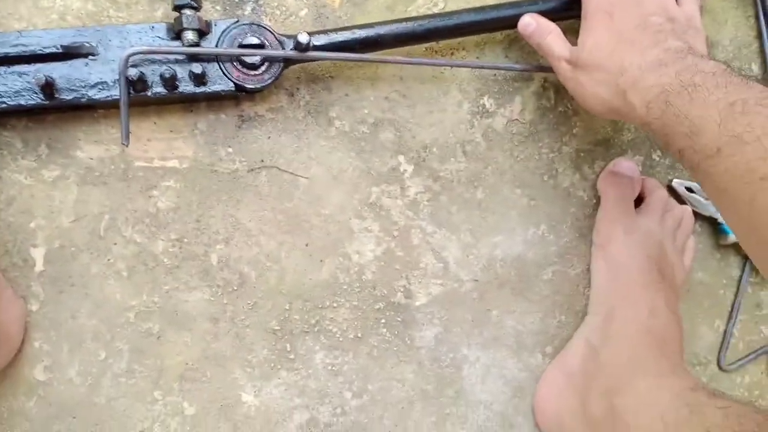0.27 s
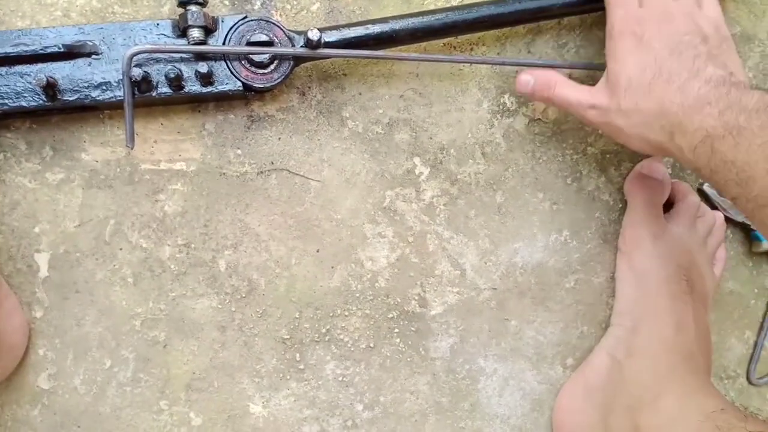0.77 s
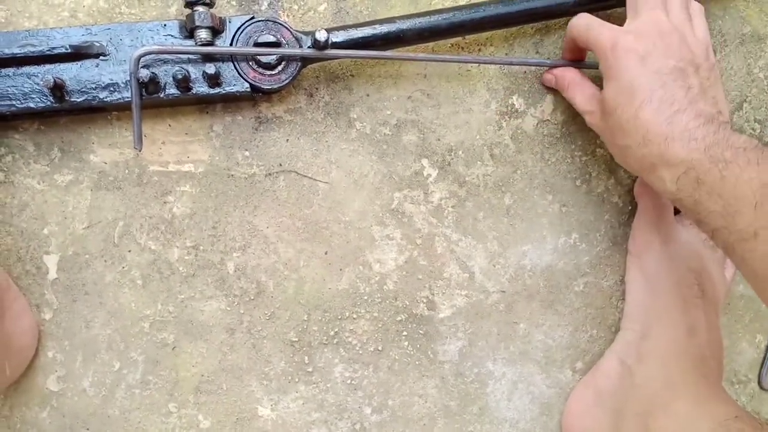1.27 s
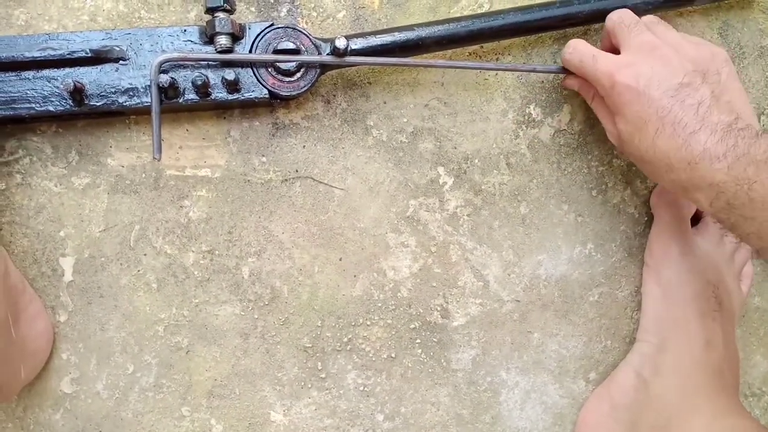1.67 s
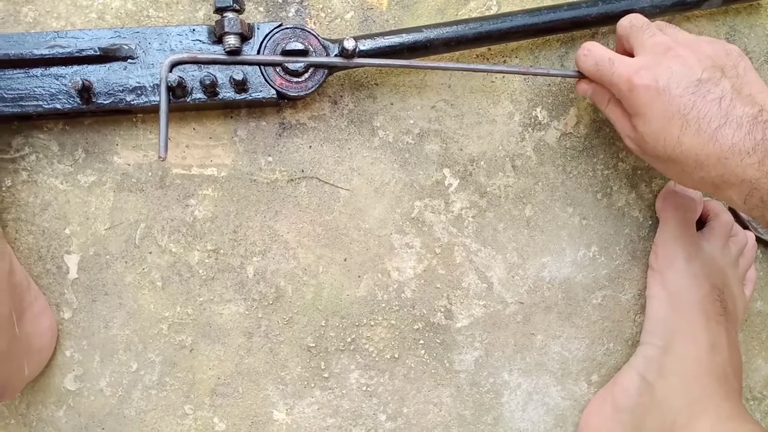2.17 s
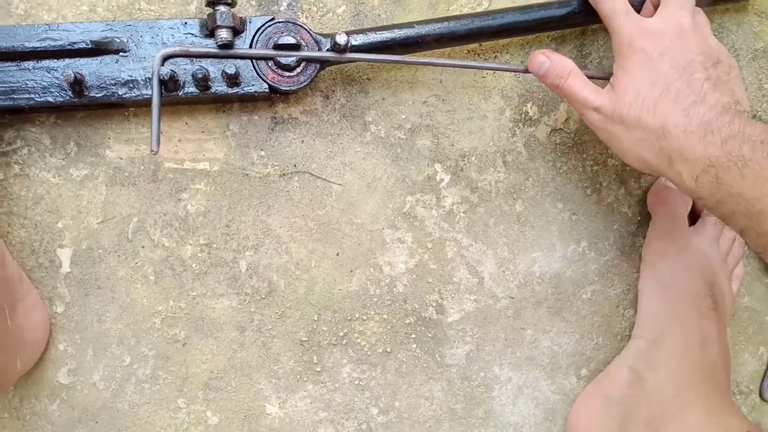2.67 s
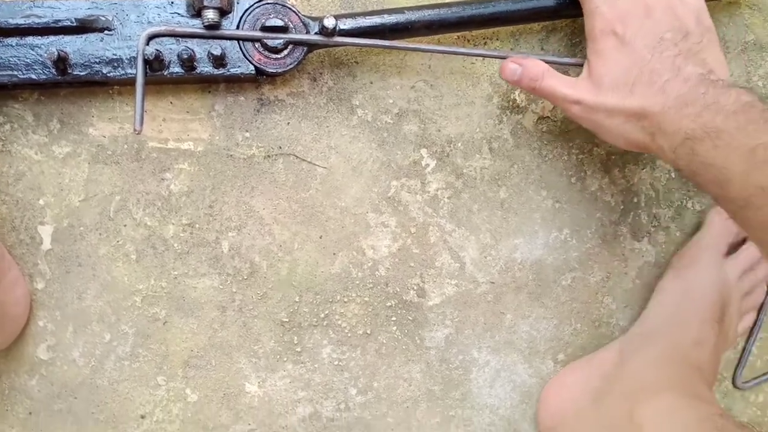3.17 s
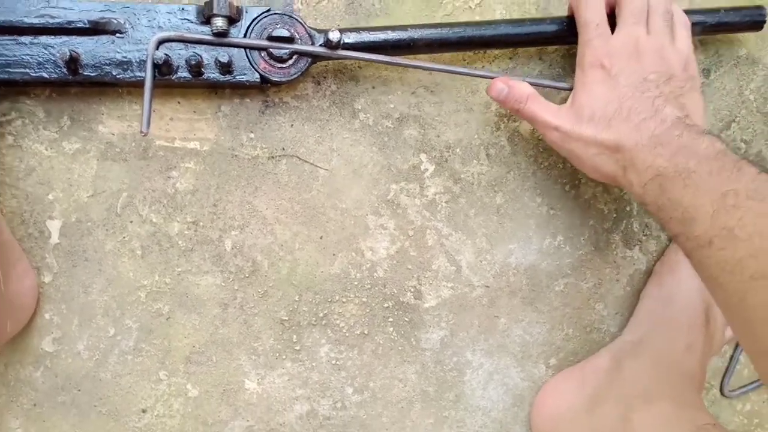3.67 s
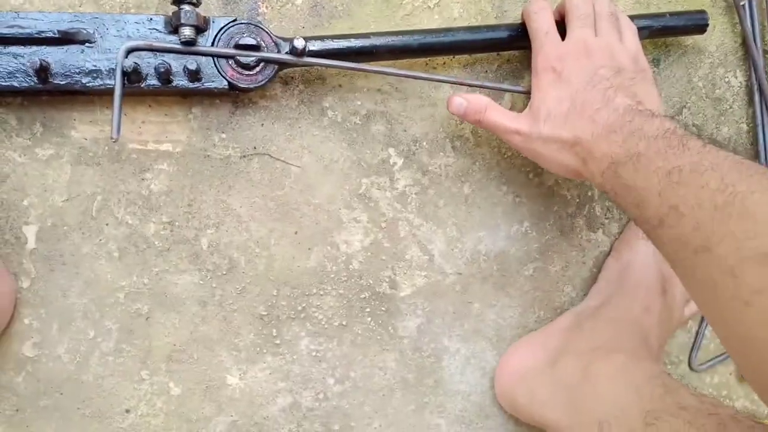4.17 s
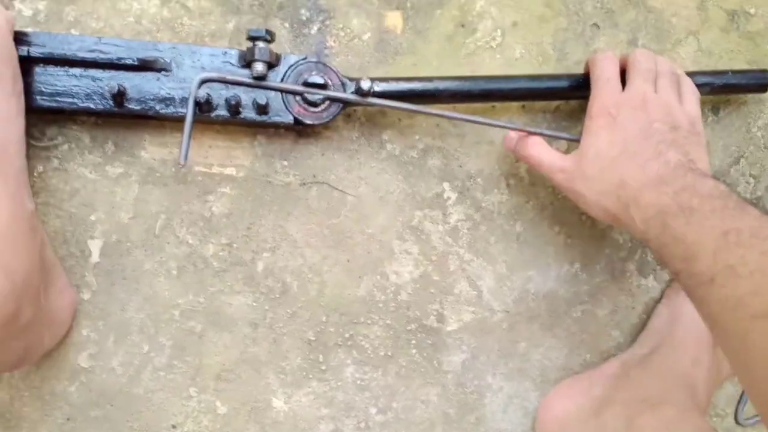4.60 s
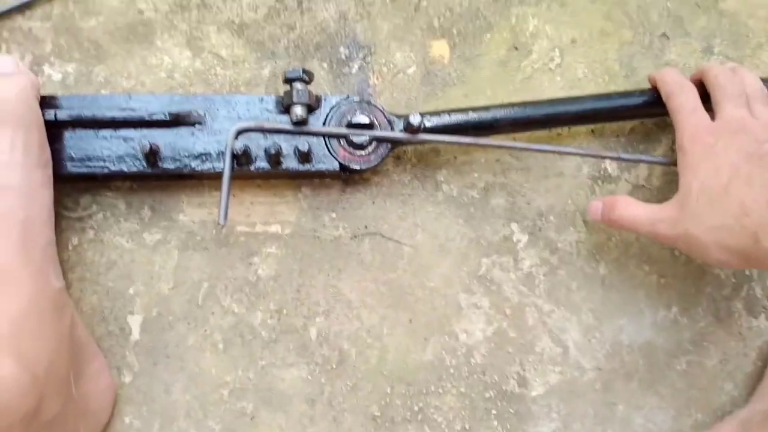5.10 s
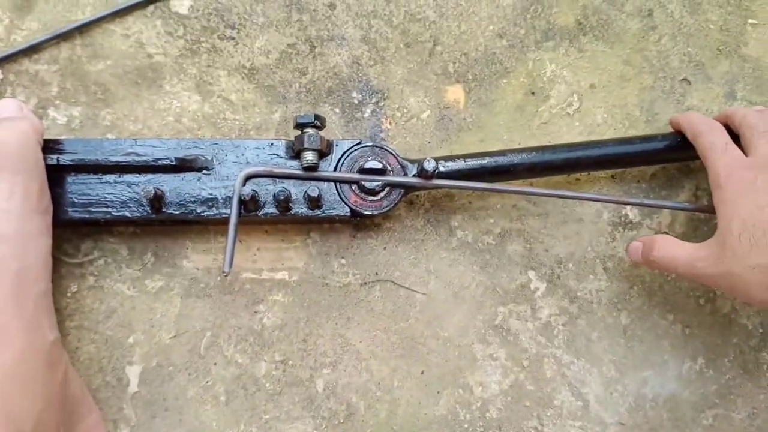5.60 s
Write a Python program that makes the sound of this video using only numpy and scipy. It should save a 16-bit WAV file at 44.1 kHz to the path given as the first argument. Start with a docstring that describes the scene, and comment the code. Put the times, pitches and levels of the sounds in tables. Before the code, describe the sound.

A hand brushes softly over a metal bending tool during the first second, close by. A thin steel bar knocks lightly against it at about 1.4 and 1.5 seconds. At 2 seconds a brief rasp leads into a sharp, ringing clink, the loudest sound. From 3.1 to 3.8 seconds the handling gets busier: skin slides, the bar snaps over a pin with bright ticks near 3.3, and the lever's pivot grinds in short pushes, with light clanks around 3.5 and 3.8. A bare foot drags faintly on concrete at about 4 seconds. At 4.4 seconds another rasp comes with one very short, shrill steel squeak. Hard walls add a short echo to the handling. Underneath, all very faint, are steady outdoor air, a distant motor hum and a high insect whine that swells and fades. A tiny, thin chirp sounds near 5.8 seconds.

```python
"""A thin steel bar knocks and ticks against the pins of a homemade lever bender as it is settled in.
The lever grinds round on its pivot, and steel slips on steel with one short, shrill squeak.
A hand brushes the tool and a bare foot drags over the concrete floor; hard walls throw it all back.
Far off, a motor hums and insects swell in the outdoor air; a thin, high chirp comes at the end."""
import sys
import numpy as np
from scipy import signal
from scipy.fft import rfft, irfft, next_fast_len
from scipy.io import wavfile
from scipy.ndimage import map_coordinates

SR = 44100
rng = np.random.default_rng(int(sys.argv[2]) if len(sys.argv) > 2 else 0)


def to_wav(sig):
    """Store sig (one row per channel, or 1-D mono) as 16-bit WAV at the path in sys.argv[1].

    Samples outside -1..1 are clipped; the rate is SR.
    """
    pcm = np.clip(np.atleast_2d(sig), -1, 1) * 32767
    pcm = np.round(pcm).astype(np.int16)
    wavfile.write(sys.argv[1], SR, pcm.T)  # frames by channels


N = 257746
TIME = np.arange(N) / SR


def from_db(db):
    """Decibels to gain."""
    return 10 ** (np.asarray(db) / 20)


def rms_one(x):
    """Scale to rms 1."""
    return x / np.sqrt(np.mean(x ** 2) + 1e-20)


def at_level(x, db):
    """Set the rms of the first 10 ms of a hit."""
    return x * from_db(db) / np.sqrt(np.mean(x[:SR // 100] ** 2) + 1e-20)


def at_hz(points, hz):
    """Read a curve on a log-frequency axis."""
    known_hz, values = np.transpose(points)
    return np.interp(np.log(np.maximum(hz, 1)), np.log(known_hz), values)


def noise(spectrum, size=N):
    """Noise coloured by an EQ curve of (Hz, dB) points; rms 1."""
    padded = next_fast_len(size)
    colour = from_db(at_hz(spectrum, np.fft.rfftfreq(padded, 1 / SR)))
    return rms_one(irfft(rfft(rng.standard_normal(padded)) * colour, padded)[:size])


def drift(rate_hz):
    """A random modulator that glides to a new value rate_hz times a second; rms 1."""
    knots = rng.standard_normal(8192)
    return rms_one(map_coordinates(knots, [TIME * rate_hz], order=1, mode="wrap"))


def swell(start, rise_s, t60, hold_s=0):
    """Envelope of one movement: a smooth rise, a hold and an exponential fade; peak 1."""
    t = TIME - start
    rise = np.sin(np.pi / 2 * np.clip(t / rise_s, 0, 1)) ** 2
    return rise * from_db(-60 * np.maximum(t - rise_s - hold_s, 0) / t60)


def arch(centre, width_s):
    """A bell-shaped envelope; peak 1."""
    return np.exp(-((TIME - centre) / width_s) ** 2)


def band(x, edges_hz, kind):
    """A gentle Butterworth filter."""
    return signal.sosfilt(signal.butter(2, edges_hz, kind, fs=SR, output="sos"), x)


def add(out, start, sound):
    """Mix a sound in at a time in seconds."""
    first = round(start * SR)
    out[first:first + len(sound)] += sound[:N - first]


def ringing(modes, damping, spread_db):
    """Struck modes, their levels scattered by spread_db and each t60 divided by damping; peak 1."""
    t = TIME[:SR // 2]
    out = np.zeros(len(t))
    for hz, db, t60 in modes:
        envelope = from_db(db + spread_db * rng.standard_normal() - 60 * damping * t / t60)
        out += envelope * np.sin(2 * np.pi * hz * t) * rng.choice([-1, 1])
    return out / np.abs(out).max()


def crack(spectrum, t60):
    """Crowded, heavily damped modes: a noise burst that dies at once."""
    t = TIME[:SR // 2]
    return noise(spectrum, size=len(t)) * from_db(-60 * t / t60)


def air(level_db=-64):
    """A steady, low bed of outdoor air."""
    # The air's colour. Each row: frequency in Hz, relative level in dB.
    air_eq = [(25, -23), (64, -14.5), (95, -4.5), (125, -5), (170, -10), (313, -10.5), (480, -13.5),
              (600, -16.5), (850, -15), (1050, -18), (4000, -25.5), (5600, -38.5), (8800, -34.5),
              (15500, -43.5)]
    return from_db(level_db) * noise(air_eq)


def motor(speed_hz=48.23, unsteady=0.004, waver_db=1.2):
    """A far motor hums at multiples of its slightly unsteady speed, each line wavering in level."""
    # The hum's lines. Each row: multiple of the speed, level in dB.
    hum_lines = [(2, -69), (3, -69), (11, -67.5), (15, -77), (16, -78.5), (17, -74.5), (18, -79)]
    turns = np.cumsum(speed_hz * (1 + unsteady * drift(18))) / SR
    out = np.zeros(N)
    for multiple, db in hum_lines:
        level = from_db(db + waver_db * drift(20))
        out += level * np.sqrt(2) * np.sin(2 * np.pi * multiple * (turns + rng.random()))
    return out


def insects(lull_db=-88):
    """Far insects whine in one narrow band that swells in bouts."""
    # The bouts. Each row: start in seconds, hold in seconds, level in dB.
    bouts = [(0.0, 0.89, -87), (1.7, 1.6, -80.5), (4.65, 0.43, -81.5)]
    # The whine's colour. Each row: frequency in Hz, relative level in dB.
    whine_eq = [(4250, -42.5), (4480, 3), (4580, 1), (4800, -41.5)]
    level = sum(from_db(db) * swell(start, rise_s=0.11, t60=0.56, hold_s=hold_s)
                for start, hold_s, db in bouts)
    return np.hypot(from_db(lull_db), level) * noise(whine_eq)


def chirp(base_hz=8800, rise_hz=1930, level_db=-80, lower_ratio=0.91, lower_db=-4):
    """Two faint high tones arch up and down together, loudest at the top."""
    contour = arch(5.787, width_s=0.058)
    phase = 2 * np.pi * np.cumsum(base_hz + rise_hz * contour) / SR
    voices = np.sin(phase) + from_db(lower_db) * np.sin(lower_ratio * phase)
    return from_db(level_db) * np.sqrt(contour) * voices


def foot_scuff(grain_db=2, band_hz=(300, 900)):
    """A bare sole drags over concrete with a dull, grainy rustle."""
    # The drag. Each row: start, rise and fade t60 in seconds, level in dB.
    scuffs = [(3.82, .28, .6, -62)]
    level = sum(from_db(db) * swell(start, rise_s, t60) for start, rise_s, t60, db in scuffs)
    grains = rng.standard_normal(N) * from_db(grain_db * drift(95))
    return level * rms_one(band(grains, band_hz, "band"))


def hand_brush(resting_db=-79.5, grain_db=1, rise_per_t60=0.094):
    """Dry skin hisses over small roughnesses in quick-rising strokes and never lies quite still."""
    # The strokes. Each row: start in seconds, fade t60 in seconds, level in dB.
    strokes = [(-0.025, .6, -57.5), (0.154, 0.29, -65), (0.822, 0.25, -68.5), (1.064, 0.72, -77.5),
               (2.238, 0.28, -66.5), (2.943, 1.06, -62.5), (3.11, 0.93, -58.5), (4.038, .45, -64.5)]
    # The colour of sliding skin. Each row: frequency in Hz, relative level in dB.
    skin_eq = [(590, -42.5), (1000, -11.5), (1680, -2), (2060, -8.5), (2940, -7), (6410, -14.5), (8940, 1),
               (10900, -17), (15500, -15)]
    swells = [from_db(db) * swell(start, rise_per_t60 * t60, t60) for start, t60, db in strokes]
    level = np.sqrt(from_db(resting_db) ** 2 + np.sum(np.square(swells), axis=0))
    return level * rms_one(noise(skin_eq) * from_db(grain_db * drift(220)))


def lever_grind(rough_db=3.5, ring_trim_db=-2):
    """With each push, uneven slips in the pivot rasp and set the lever ringing."""
    # The pushes. Each row: start, rise and fade t60 in seconds, rasp level in dB, send to the ring in dB.
    pushes = [(1.967, 0.014, .11, -49.5, 0), (3.15, 0.041, 0.31, -57, -14), (3.453, .025, .21, -48, -7),
              (3.695, .094, .17, -43, 3.5), (4.43, .018, .19, -43.5, -21.5)]
    # The rasp's colour. Each row: frequency in Hz, relative level in dB.
    pivot_eq = [(88, -50), (150, -16), (500, -13.5), (583, -20), (1000, -16.5), (1400, -14.5),
                (1830, -17.5), (2100, -15.5), (2270, -20.5), (3160, -15.5), (6730, -32.5), (8660, -19),
                (15500, -52.5)]
    # The lever's modes. Each row: frequency in Hz, relative level in dB, t60 in seconds before damping.
    lever_modes = [(350, -14, 0.15), (1362, 0, 0.12), (1382, 0, .25), (3200, -10, 0.43), (3300, -6.5, 0.38),
                   (3290, -8, .36)]
    slips = rms_one(from_db(rough_db * drift(350)))
    rasp_level = ring_drive = 0
    for start, rise_s, t60, db, send_db in pushes:
        force = from_db(db) * swell(start, rise_s, t60) * slips
        rasp_level += force
        ring_drive += from_db(send_db) * force
    lever = ringing(lever_modes, damping=1.3, spread_db=0)
    ring = signal.fftconvolve(ring_drive * rng.standard_normal(N), lever / np.linalg.norm(lever))[:N]
    return rasp_level * noise(pivot_eq) + from_db(ring_trim_db) * ring


def bar_ticks(click_trim_db=-5, ring_trim_db=2):
    """The bar's edge snaps over a pin: tiny hard contacts ring the thin steel's high modes."""
    # The snaps. Each row: start in seconds, level in dB before the trims.
    snaps = [(3.165, -52), (3.186, -43.5), (3.279, -38), (3.285, -30), (3.292, -31)]
    # The click's colour. Each row: frequency in Hz, relative level in dB.
    click_eq = [(350, -60), (600, -20), (1380, -8.5), (2280, -17), (3240, -2.5), (6230, -18), (8630, 5.5),
                (13900, -17), (14900, -19), (15500, -30)]
    # The bar's modes. Each row: frequency in Hz, relative level in dB, t60 in seconds before damping.
    bar_modes = [(5475, -9, .24), (6520, -10, .32), (8086, -11, .45), (8430, -3, .22), (8915, -6, .42),
                 (9302, -13, .4), (10240, -5, .25), (10560, -10, .19), (11616, -11, .19), (11910, -16, .22),
                 (12860, -6, .12), (13113, -1, .18), (14680, -7, .2)]
    out = np.zeros(N)
    for start, db in snaps:
        click = from_db(db + click_trim_db) * crack(click_eq, t60=0.086)
        ring = from_db(db + ring_trim_db) * ringing(bar_modes, damping=1.34, spread_db=1)
        add(out, start, click + ring)
    return out


def bar_knocks(clank_trim_db=-3, thud_trim_db=-2, edge_trim_db=1, ring_trim_db=-3):
    """Bar and lever clank on the frame; weight brings a thud, a hard contact a bright edge."""
    # The hits. Each row: start in seconds, then clank, thud, edge and ring mix in dB before the trims.
    hits = [(1.3875, -41, -62, -69, -0.5), (1.508, -34, -61.5, -67, -1.5), (2.0030, -21, -44.5, -29, -0.5),
            (2.657, -60, -67, -72, 3), (3.206, -55.5, -54.5, -49, -13), (3.3333, -53, -61, -62, -20),
            (3.4209, -50.5, -59, -69, 4), (3.468, -36, -48.5, -49, -20), (3.703, -53.5, -63, -72, -13),
            (3.756, -36.5, -49, -68, -4), (3.7839, -32.5, -45, -51, -21)]
    # The colour of a knock's dead part. Each row: frequency in Hz, relative level in dB.
    clank_eq = [(200, -17.5), (600, -17.5), (950, -12.5), (1400, 6), (1850, -8.5), (2250, -7.5),
                (2480, -18.5), (2700, -10), (3050, -15.5), (3480, -8.5), (5700, -34.5), (9100, -9.5),
                (11500, -35.5), (15500, -62)]
    # The frame's modes. Each row: frequency in Hz, relative level in dB, t60 in seconds before damping.
    frame_modes = [(1394, -3, .22), (1482, 1, 0.33), (1660, -7.5, .34), (2200, -7.5, 0.46),
                   (2660, -11.5, .27), (2660, -4.5, .28), (3410, -4, 0.25), (3940, -12, 0.15),
                   (5010, -13, 0.13), (8500, -13, 0.16), (9050, -18, 0.14), (9190, -12.5, .19),
                   (9405, -9, .22)]
    thud_eq = [(120, -20), (300, 1), (900, -0.5), (1400, -23)]
    hardest_db = max(hit[1] for hit in hits)
    out = np.zeros(N)
    for start, clank_db, thud_db, edge_db, ring_db in hits:
        blow = crack(clank_eq, t60=0.06)
        blow += from_db(ring_db + ring_trim_db) * ringing(frame_modes, damping=1.57, spread_db=3.5)
        top_hz = max(5200 + 100 * (clank_db - hardest_db), 2000)   # softer knocks are duller
        clank = band(blow, [1000, top_hz], "band")
        thud = band(crack(thud_eq, t60=0.18), 320, "high")
        edge = band(band(blow, 5800, "high"), [5000, 14000], "band")
        add(out, start, at_level(clank, clank_db + clank_trim_db))
        add(out, start, at_level(thud, thud_db + thud_trim_db))
        add(out, start, at_level(edge, edge_db + edge_trim_db))
    return out


def steel_squeak(start=4.428, slip_hz=3276, gripped_hz=3105, jitter=0.0098, gain_db=-12.5):
    """Steel sticks and slips on steel at one pitch, which sags as the grip tightens and the tone bites."""
    # The squeak's partials. Each row: multiple of the pitch, level in dB before gain and overtone lift.
    harmonics = [(1, 1.5), (2, -6), (3, -5), (4, -28.5)]
    grip_after_s, sag_s, tightest_after_s = 0.013, 0.002, 0.016
    loose_db, tight_db = -18.5, 1.5   # overtone lift at either extreme of the grip
    gripped = (1 + np.tanh((TIME - start - grip_after_s) / sag_s)) / 2
    hz = slip_hz + (gripped_hz - slip_hz) * gripped
    phase = 2 * np.pi * np.cumsum(hz * (1 + jitter * drift(600))) / SR
    lift_db = loose_db + (tight_db - loose_db) * arch(start + tightest_after_s, width_s=0.01)
    tone = sum(from_db(db + lift_db * (k > 1)) * np.sin(k * phase) for k, db in harmonics)
    return from_db(gain_db) * swell(start, rise_s=0.016, t60=0.039, hold_s=0.008) * tone


def room(x, wet_db, build_s):
    """Reflections from floor and walls thicken into a tail whose top end dies first."""
    # The reverb's decay. Each row: frequency in Hz, t60 in seconds.
    decay_times = [(200, 1), (1500, 0.45), (3200, 0.66), (6300, .44), (9500, 0.49), (15000, 0.04)]
    t = TIME[:int(0.7 * SR)]
    hz = np.fft.rfftfreq(len(t), 1 / SR)
    white = rfft(rng.standard_normal(len(t)))
    edges_hz = np.geomspace(100, 18000, 16)
    tail = np.zeros(len(t))
    for low, high in zip(edges_hz, edges_hz[1:]):
        t60 = at_hz(decay_times, np.sqrt(low * high))
        tail += irfft(white * ((hz >= low) & (hz < high)), len(t)) * from_db(-60 * t / t60)
    tail *= 1 - np.exp(-(t / build_s) ** 2)
    return x + from_db(wet_db) * signal.fftconvolve(x, tail / np.linalg.norm(tail))[:N]


def scene():
    """Close handling and a wetter squeak between hard walls, over a faint dry background; mono."""
    handling = bar_knocks() + bar_ticks() + lever_grind() + hand_brush() + foot_scuff()
    close = room(handling, wet_db=-10.5, build_s=0.0034)
    squeak = room(steel_squeak(), wet_db=-5, build_s=0.006)
    return (close + squeak + chirp() + motor() + insects() + air())[None]


def record(dry, cutoff_hz=15700):
    """A steep low-pass takes off the very top."""
    return signal.sosfilt(signal.ellip(10, 0.1, 80, cutoff_hz, fs=SR, output="sos"), dry)


dry = scene()
out = record(dry)
to_wav(out)
```